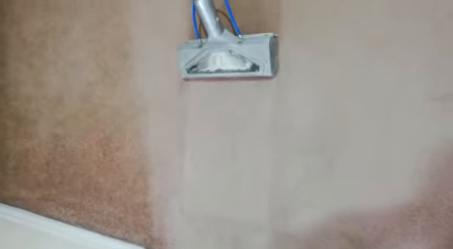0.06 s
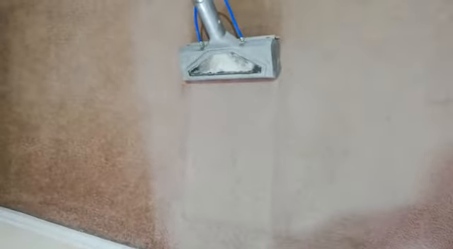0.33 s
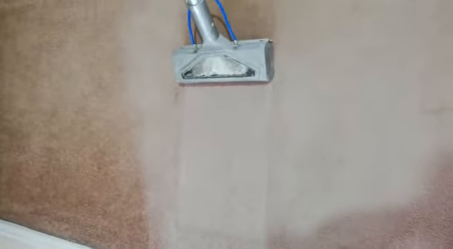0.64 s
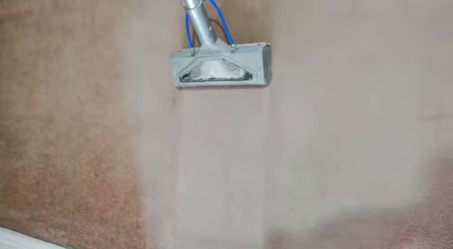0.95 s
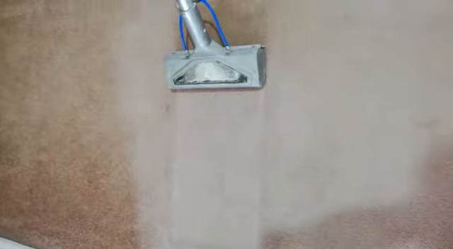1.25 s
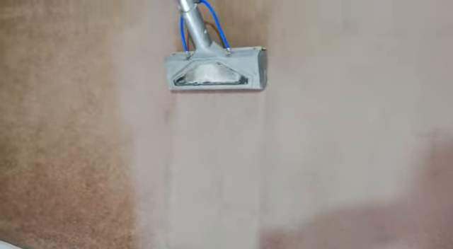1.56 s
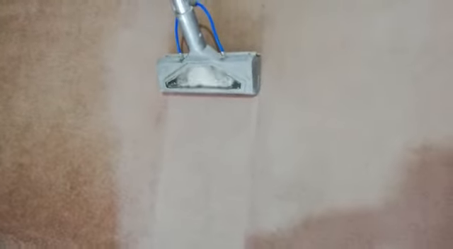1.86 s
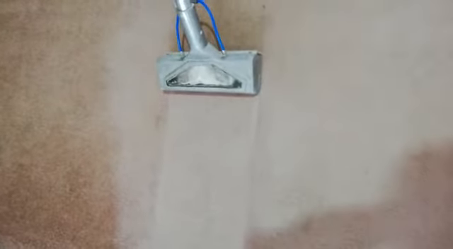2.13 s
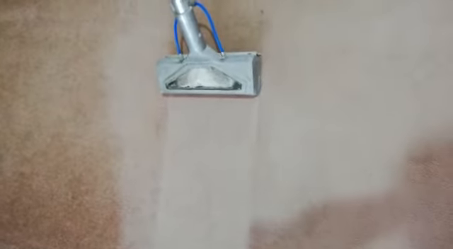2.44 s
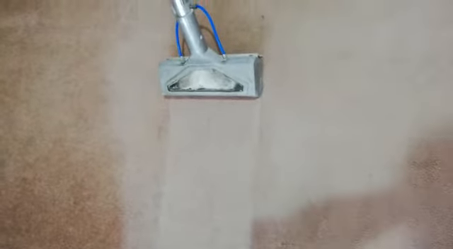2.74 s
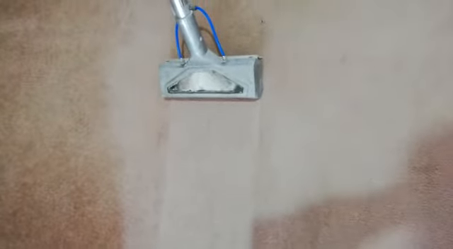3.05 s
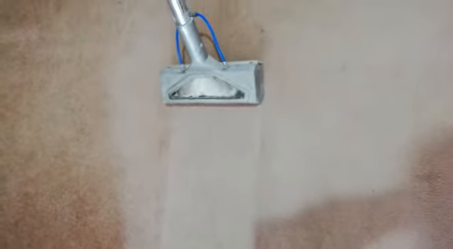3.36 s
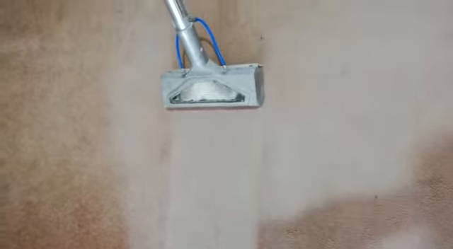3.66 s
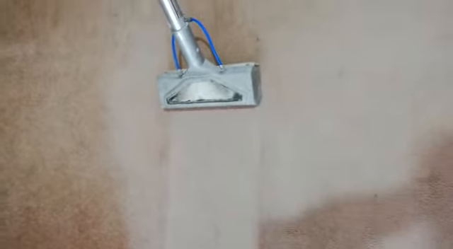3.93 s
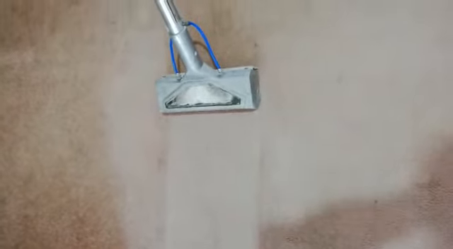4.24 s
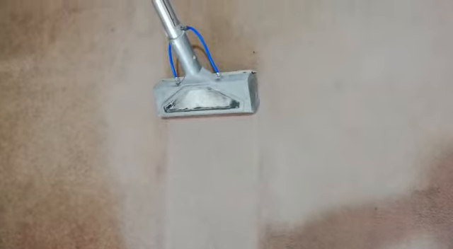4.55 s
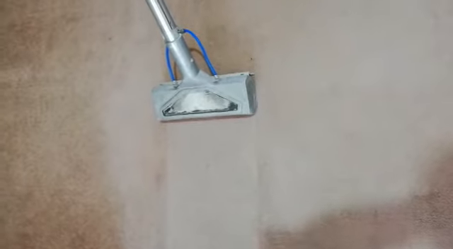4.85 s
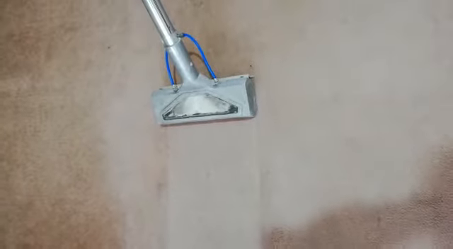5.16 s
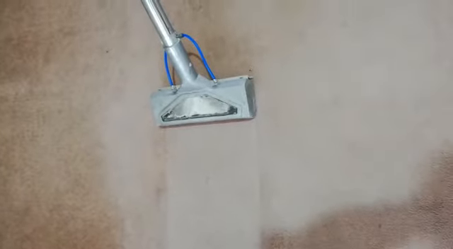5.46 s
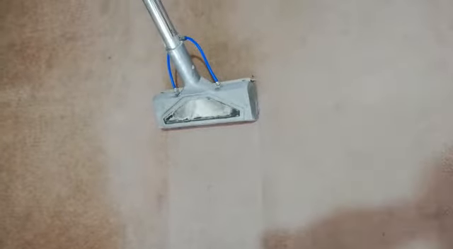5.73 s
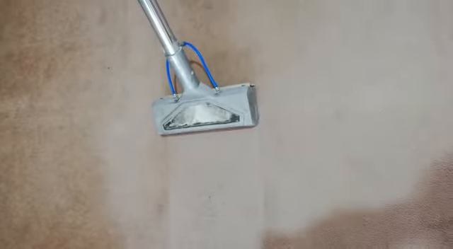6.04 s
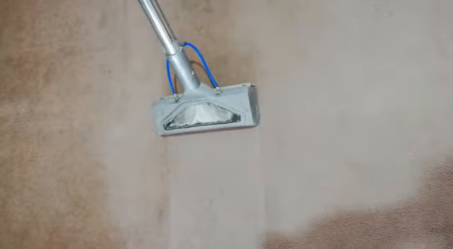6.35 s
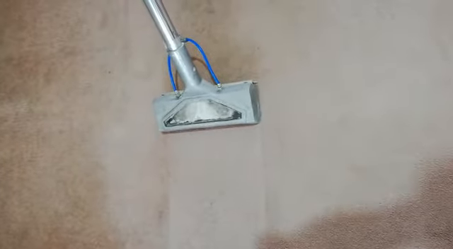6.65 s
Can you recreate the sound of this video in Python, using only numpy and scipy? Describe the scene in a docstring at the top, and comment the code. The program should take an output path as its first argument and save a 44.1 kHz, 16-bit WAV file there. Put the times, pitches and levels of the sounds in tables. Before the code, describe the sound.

A carpet cleaner's vacuum motor runs in a room for the whole seven seconds or so. It gives a steady, medium-low hum, strongest at the start and gradually easing, with a faint electrical hum and a rumble of air underneath. Over this is the broad, bright hiss of suction as the wand is drawn across wet carpet, growing very slightly. A thin, high fan whine throbs and swells in waves, shifting between left and right, and stands out near 0.4, 2.4 and 4.6 seconds. A somewhat lower whining tone rises briefly around 5 seconds. Soft, airy whistles come from the nozzle at the start, near 1.8 seconds and between about 4.8 and 6 seconds. The hose gives very faint, deep booms near 0.9, 3.5 and 6.6 seconds. The motor's pitch barely changes, and it is still running at the end.

```python
"""A carpet extractor's vacuum motor runs steadily in a room while its wand is drawn over wet carpet.
The mains-fed motor hums at its shaft rate; its eleven-blade fan whines, throbbing with the mains.
The tones swell and fade in the room's standing waves. Air rumbles in the tank, hisses into the
wand's slot, whistles briefly under its lip and booms now and then in the hose."""
import sys
import numpy as np
from scipy import signal
from scipy.fft import rfft, irfft
from scipy.io import wavfile

SR = 44100
rng = np.random.default_rng(int(sys.argv[2]) if len(sys.argv) > 2 else 0)


def generate_wav(sig):
    """Save sig (samples, or channels by samples) to the path in sys.argv[1] as 16-bit PCM at SR."""
    pcm = np.round(np.clip(np.atleast_2d(sig).T, -1, 1) * 32767).astype(np.int16)
    wavfile.write(sys.argv[1], SR, pcm)


N = 299880
T = np.arange(N) / SR
FREQS = np.arange(N // 2 + 1) * SR / N
BLADES, RIPPLE_HZ, LEFT_LAG_S = 11, 100, 0.00059
TURN_RAD_PER_S = -5  # left-right phase drift as the microphones move through the whine's short waves


def undb(db):
    """Decibels to gain."""
    return 10 ** (np.asarray(db) / 20)


def curve(table):
    """Rows of (time, value) interpolated per sample."""
    return np.interp(T, *np.transpose(table))


def swell(peak_s, sigma_s):
    """Gaussian rise and fall."""
    return np.exp(-((T - peak_s) / sigma_s) ** 2 / 2)


def colour(hz, db_per_hz):
    """Gain per bin that shapes white noise to a spectral density."""
    return undb(np.interp(np.log(FREQS + 1), np.log(hz), db_per_hz)) * np.sqrt(SR / 2)


def wander(rate_hz, points=2048):
    """Smooth random drift: mean 0, spread 1."""
    hz = np.arange(points // 2 + 1) * SR / N
    lowpass = np.exp(-(hz / rate_hz) ** 2 / 2) * (hz > 0)
    drift = irfft(rfft(rng.standard_normal(points)) * lowpass)
    return np.interp(T, np.linspace(0, T[-1], points), drift / drift.std())


def scatter(rate_hz):
    """Many shifting echo paths: a wandering complex gain of power 1."""
    return (wander(rate_hz) + 1j * wander(rate_hz)) / np.sqrt(2)


def stereo_scatter(rate_hz):
    """Independent echo gains, left and right."""
    return np.array([scatter(rate_hz), scatter(rate_hz)])


def place(right_db, lead_rad=0):
    """Complex stereo gains from the right side's level and phase relative to the left."""
    return undb(np.array([[-right_db], [right_db]]) / 2) * np.exp(1j * np.array([[0], [1]]) * lead_rad)


def tone(phase, rms_db, gain):
    """A sine heard through a complex gain."""
    return np.sqrt(2) * undb(rms_db) * np.real(gain * np.exp(1j * phase))


# Motor speed: time_s, shaft_hz
SHAFT_SPEED = [(0.0, 366.47), (0.45, 366.22), (0.95, 366.78), (1.5, 366.34), (2.15, 367.15), (2.85, 367.27),
               (4.1, 369.22), (5.2, 370.34), (5.8, 368.93), (6.5, 368.11), (6.8, 368.88)]


def shaft_phase():
    """Shaft angle; the motor speeds up slightly as the carpet seals the slot."""
    return 2 * np.pi * np.cumsum(curve(SHAFT_SPEED)) / SR


# Lower mains sideband of the hum: time_s, level_db
HUM_SIDEBAND = [(0, -37), (1.25, -38.5), (2.25, -36.5), (2.6, -39.5), (3.3, -39.5), (4.0, -36), (4.6, -43),
                (5.2, -41.5), (5.45, -38), (6.8, -42.5)]
# Weak shaft harmonics: order, level_db
SHAFT_ORDERS = [(2, -52.5), (3, -55.5), (5, -57), (7, -49), (8, -51.5), (9, -64), (10, -57), (12, -50.5),
                (15, -54), (20, -51), (23, -59), (24, -63)]


def motor_hum(shaft, ripple, start_db=-20, drift_db_per_s=-1.3151):
    """Imbalance hums at the shaft rate, torque ripple adds sidebands, higher orders drift in and out."""
    hum_db = start_db + drift_db_per_s * T  # slow passage through a long standing wave
    out = tone(shaft, hum_db, place(right_db=2.5, lead_rad=1.87))
    lower_gain = place(right_db=-2.5, lead_rad=0.9) * (1 + 0.2 * scatter(rate_hz=4.2))
    upper_gain = place(right_db=2.5, lead_rad=1.95) * (1 + 0.5 * scatter(rate_hz=3.5))
    out += tone(shaft - ripple, curve(HUM_SIDEBAND), lower_gain)
    out += tone(shaft + ripple, rms_db=-47.5, gain=upper_gain)
    shaft_lead_rad = 2 * np.pi * SHAFT_SPEED[0][1] * LEFT_LAG_S
    for order, level_db in SHAFT_ORDERS:
        fading = 0.76 + 0.69 * stereo_scatter(rate_hz=2)
        out += tone(order * shaft, level_db, place(right_db=6, lead_rad=order * shaft_lead_rad) * fading)
    return out


# Lower mains sideband of the whine, heard as a throb: time_s, level_db
WHINE_THROB = [(0, -42), (.9, -49), (1.3, -34.5), (2.15, -43), (2.5, -35.5), (3.2, -30), (3.9, -42),
               (4.5, -34.5), (5.15, -46), (5.65, -33), (5.95, -47), (6.2, -39), (6.8, -34)]
# Other whine sidebands, before fading: ripple_multiple, level_db
RIPPLE_SIDEBANDS = [(-2, -49), (1, -43.5), (2, -49.5)]


def fan_whine(shaft, ripple, blade_db=-51.5, whine_db=-43):
    """Blade tone and its louder octave, which throbs at the mains ripple; each line fades on its own."""
    blade_gain = place(right_db=-2, lead_rad=0.92) * (1 + 0.59 * stereo_scatter(rate_hz=1.7))
    out = tone(BLADES * shaft, blade_db, blade_gain)
    whine = 2 * BLADES * shaft
    out += tone(whine, whine_db, place(right_db=10.5) * stereo_scatter(rate_hz=5.8))
    turn_rad = TURN_RAD_PER_S * T
    throb_gain = place(right_db=7.5, lead_rad=turn_rad) * (1 + 0.19 * stereo_scatter(rate_hz=3.9))
    out += tone(whine - ripple, curve(WHINE_THROB), throb_gain)
    # Ripple also rocks the speed: these sidebands oppose the lower one and soften the throb.
    for multiple, level_db in RIPPLE_SIDEBANDS:
        fading = 0.58 + 0.5 * stereo_scatter(rate_hz=2.5)
        out -= tone(whine + multiple * ripple, level_db, place(right_db=10, lead_rad=turn_rad) * fading)
    return out


def mains_hum(ripple, start_db=-37, drift_db_per_s=0.45):
    """Hum at the mains ripple rate, drifting in level along its long standing wave."""
    return tone(ripple, start_db + drift_db_per_s * T, place(right_db=-0.5, lead_rad=0.033))


# Pump and casing tones: pitch_hz, level_db, right_db, lead_rad, waver_ratio
CASING_TONES = [(120.8, -52, 0, .2, .25), (162.5, -55.5, 0, .3, .7), (201, -54, 0, .5, .6),
                (241.3, -49.5, 3, .7, .45), (305, -53, 3, 1.3, .8), (327.7, -43.7, 8, 1.5, .5),
                (523, -52, 7, 1.7, .5)]


def casing_tones():
    """Pump and casing vibrate in low, wavering tones."""
    out = 0
    for pitch_hz, level_db, right_db, lead_rad, waver_ratio in CASING_TONES:
        waver = (1 + waver_ratio * scatter(rate_hz=2.8)) / np.hypot(1, waver_ratio)
        out += tone(2 * np.pi * pitch_hz * T, level_db, place(right_db, lead_rad) * waver)
    return out


# Turbulence in tank and hose: freq_hz, density_db_per_hz
RUMBLE_SPECTRUM = [(20, -73), (30, -88), (38, -68), (48, -71.5), (60, -88), (85, -71.5), (135, -74),
                   (165, -70), (240, -65), (290, -61.5), (350, -61.5), (450, -64), (560, -71.5),
                   (900, -91.5)]


def tank_rumble(corner_hz=290):
    """Low turbulence from one source; the right side gains level and phase lead with frequency."""
    air = rfft(rng.standard_normal(N)) * colour(*np.transpose(RUMBLE_SPECTRUM))
    spread = 1 / (1 + (corner_hz / (FREQS + 1)) ** 3)
    left = air * undb(-2 * spread) * np.exp(-2.4j * spread)
    right = air * undb(3.2 * spread)
    return irfft(np.array([left, right]), N)


# Slot hiss, before the low cut: freq_hz, left_db_per_hz, right_db_per_hz
HISS_SPECTRUM = [(250, -83, -72), (615, -74, -74), (663, -69.5, -70.5), (1420, -72.5, -70.5),
                 (2320, -72.5, -69), (2870, -69, -66.5), (3170, -71.5, -68.5), (5660, -74.5, -70.5),
                 (6350, -72.5, -67.5), (7520, -69.5, -67), (7980, -65.5, -62.5), (9180, -65, -66.5),
                 (12050, -75.5, -80.5), (15500, -83.5, -84)]


def slot_hiss(direct_share=0.072, direct_corner_hz=6000, low_cut_hz=200, rise_db_per_s=0.25):
    """Air tears through the wet pile: mostly diffuse hiss that grows slowly and flickers slightly."""
    hz, left_db, right_db = np.transpose(HISS_SPECTRUM)
    left, right = rfft(rng.standard_normal((2, N)))
    # The direct part is common to both sides and reaches the left later.
    share = direct_share / (1 + (FREQS / direct_corner_hz) ** 2)
    delayed = right * np.exp(-2j * np.pi * FREQS * LEFT_LAG_S)
    left = np.sqrt(1 - share ** 2) * left + share * delayed
    low_cut = FREQS ** 2 / (FREQS ** 2 + low_cut_hz ** 2)
    air = np.array([left * colour(hz, left_db), right * colour(hz, right_db)]) * low_cut
    centres_hz = np.geomspace(500, 16000, 14)
    out = 0
    for weights in np.eye(len(centres_hz)):
        band = irfft(air * np.interp(FREQS, centres_hz, weights), N)
        flicker_db = 0.16 * wander(rate_hz=1.6) + 0.83 * wander(rate_hz=19)
        out += band * undb(flicker_db)
    return out * undb(rise_db_per_s * (T - T.mean()))


# Standing-wave crests: peak_s, sigma_s, order, level_db, right_db, lead_rad
WAVE_CRESTS = [(.17, 0.12, 11, -51, 9, 2), (0.417, 0.16, 22, -32, 8.5, 3), (0.497, 0.4, 7, -50, 13, 1),
               (0.778, 0.061, 22, -34.5, 10, 4.3), (1.15, .35, 5, -55, 5, 0.5),
               (1.3, 0.4, 11, -46.5, 2, 0.7), (1.33, 0.2, 22, -34, 19, 3.5),
               (1.92, 0.15, 22, -31.5, -6, 3.5), (2.08, 0.19, 7, -45.5, 18, 1.8),
               (2.27, 0.25, 11, -44, -7, 3), (2.294, 0.66, 3, -54, 9, -1.5),
               (2.435, 0.096, 22, -28.5, 2, 0.8), (2.8, 0.42, 6, -48.5, 10, 1),
               (2.78, 0.15, 22, -32, -4, 2.5), (3.268, 0.15, 22, -33, -13, 3), (3.27, 0.16, 9, -49, 9, 0.5),
               (3.8, 0.24, 11, -44.5, 13, -0.9), (4.574, 0.13, 22, -28, 7, 3.5), (4.8, 0.15, 9, -50, 15, 2),
               (5.094, 0.19, 11, -34, 1, 3), (5.42, 0.2, 22, -33, 11, 4), (5.9, 0.21, 22, -31.5, -9, 3),
               (6.0, 0.14, 11, -42, 0, 5), (6.6, 0.21, 22, -34, 9, -1.5), (6.65, .2, 11, -48, 10, 2)]


def standing_waves(shaft):
    """Shaft orders swell as their crests pass; left-right phase turns faster for higher orders."""
    out = 0
    for peak_s, sigma_s, order, level_db, right_db, lead_rad in WAVE_CRESTS:
        turn_rad = TURN_RAD_PER_S * (T - peak_s) * order / (2 * BLADES)
        gain = place(right_db, lead_rad + turn_rad)
        out += tone(order * shaft, level_db, gain) * swell(peak_s, sigma_s)
    return out


# Wet whistles at the slot's lip: peak_s, sigma_s, pitch_hz, width_hz, level_db
LIP_WHISTLES = [(.35, 0.47, 7400, 444, -42), (1.833, 0.093, 5260, 1100, -39),
                (4.848, 0.072, 3400, 900, -41), (5.237, 0.057, 2900, 250, -42), (5.7, 0.51, 2820, 370, -45),
                (6.3, .45, 690, 70, -52)]


def lip_whistles():
    """Narrow gaps under the lip resonate briefly as the wand slides on."""
    out = 0
    for peak_s, sigma_s, pitch_hz, width_hz, level_db in LIP_WHISTLES:
        resonance = 1 / (1 + (2 * (FREQS - pitch_hz) / width_hz) ** 2)
        air = irfft(rfft(rng.standard_normal((2, N))) * resonance, N)
        out += air / air.std() * undb(level_db) * swell(peak_s, sigma_s)
    return out * place(right_db=6.5).real


# Flow surges in the hose: peak_s, sigma_s, level_db
HOSE_SURGES = [(0.864, .045, -46), (3.47, .08, -50), (6.65, .04, -52)]


def hose_booms(pitch_hz=38.5):
    """The hose's air column booms briefly when the flow surges."""
    out = 0
    for peak_s, sigma_s, level_db in HOSE_SURGES:
        phase_wobble = np.exp(1j * wander(rate_hz=2))
        out += tone(2 * np.pi * pitch_hz * T, level_db, phase_wobble) * swell(peak_s, sigma_s)
    return out


def scene():
    """Machine tones plus airflow, in stereo."""
    shaft = shaft_phase()
    ripple = 2 * np.pi * RIPPLE_HZ * T
    machine = motor_hum(shaft, ripple) + fan_whine(shaft, ripple) + mains_hum(ripple) + casing_tones()
    airflow = tank_rumble() + slot_hiss()
    return machine + airflow + standing_waves(shaft) + lip_whistles() + hose_booms()


def record(dry):
    """Steep elliptic low-pass on the top treble."""
    cutoff_hz = 15750
    return signal.sosfilt(signal.ellip(12, 0.1, 90, cutoff_hz, fs=SR, output="sos"), dry)


dry = scene()
out = record(dry)
generate_wav(out)
```